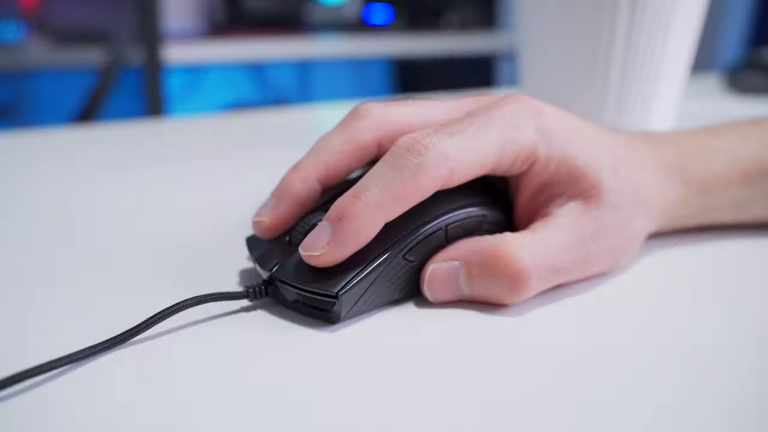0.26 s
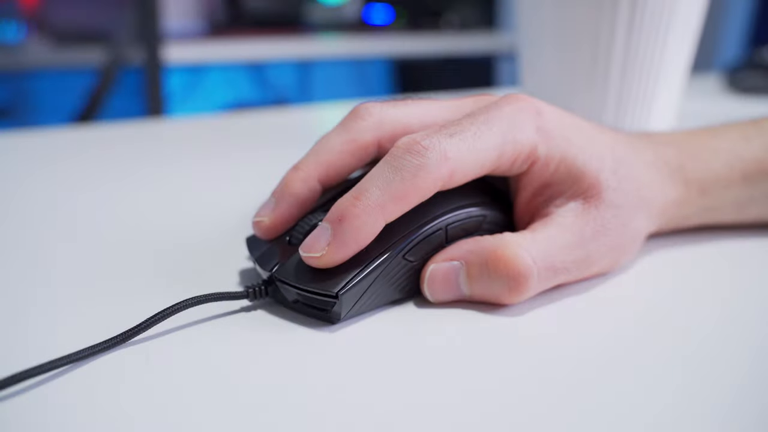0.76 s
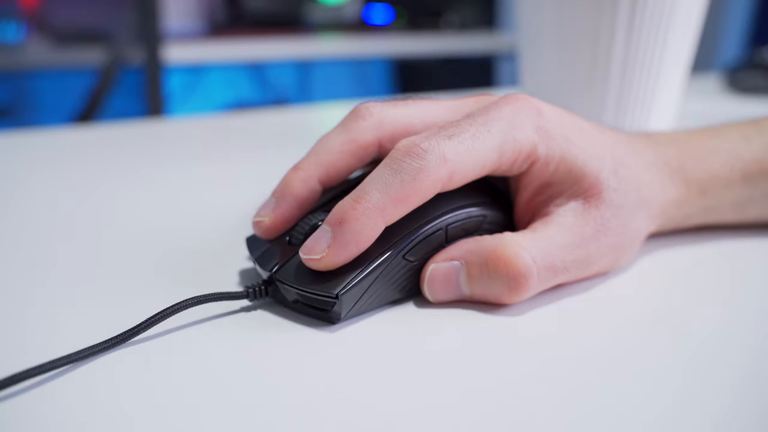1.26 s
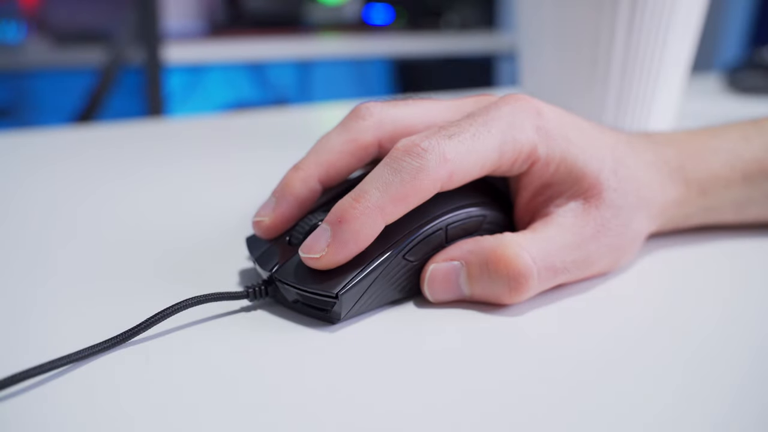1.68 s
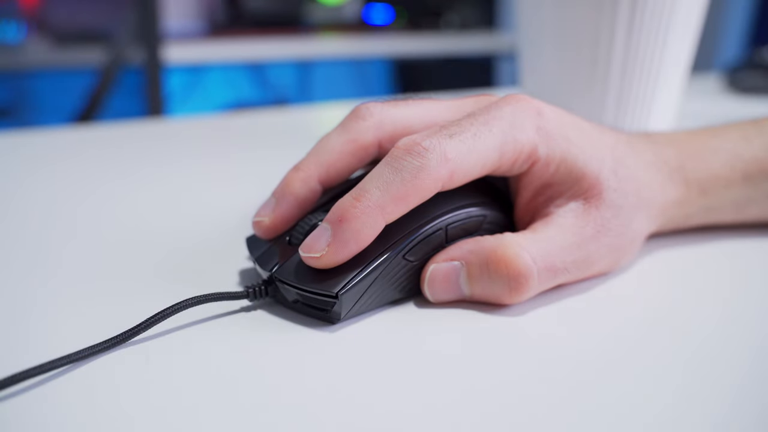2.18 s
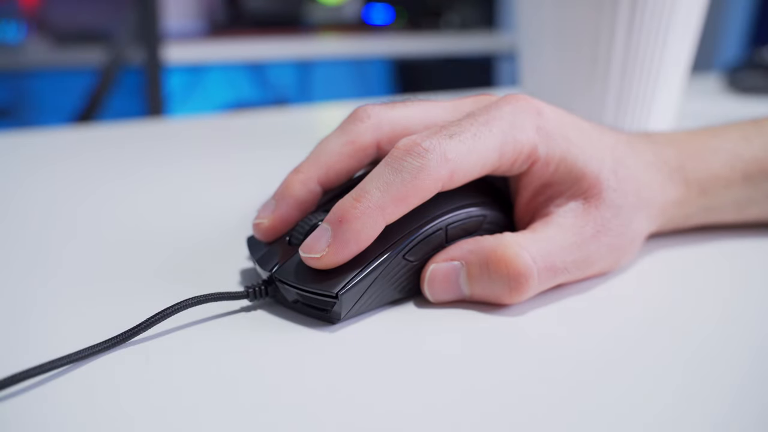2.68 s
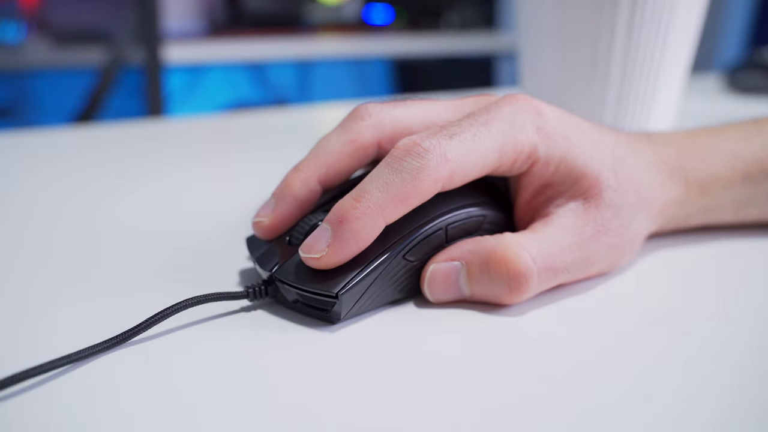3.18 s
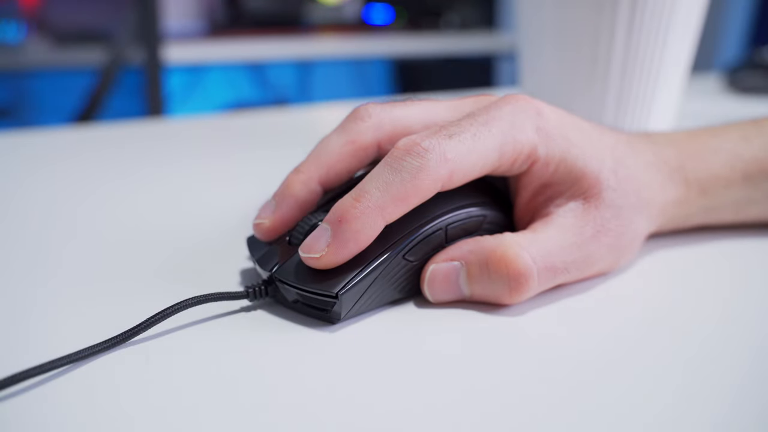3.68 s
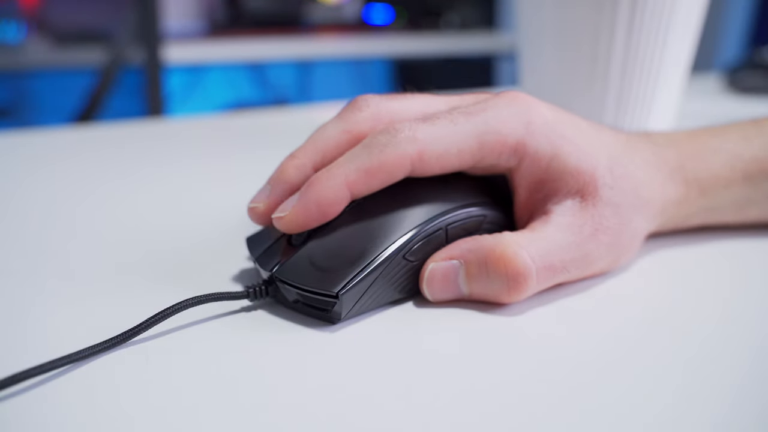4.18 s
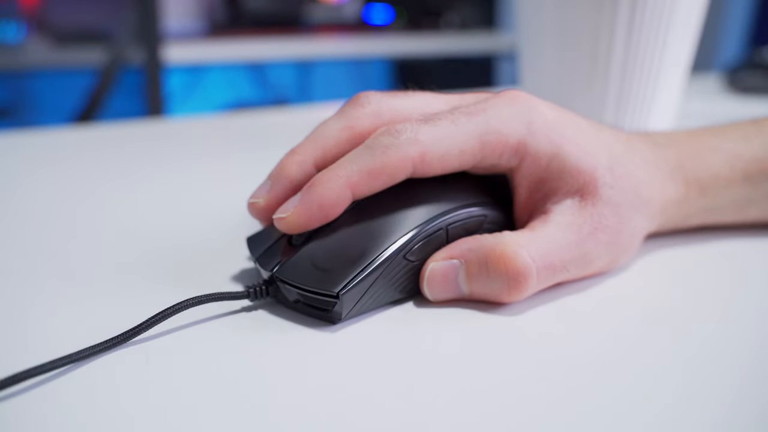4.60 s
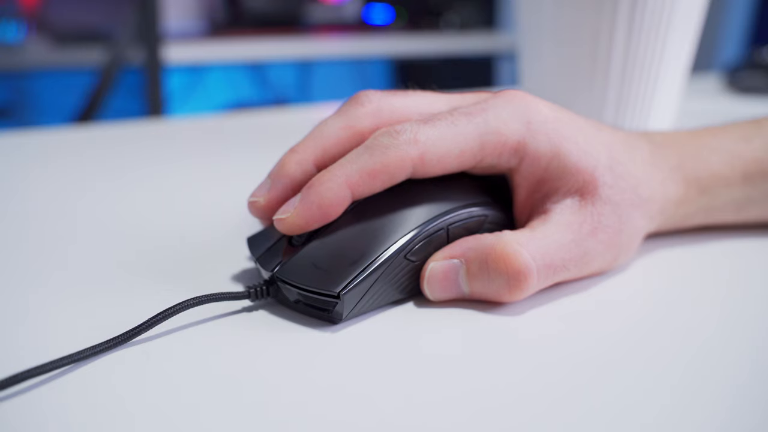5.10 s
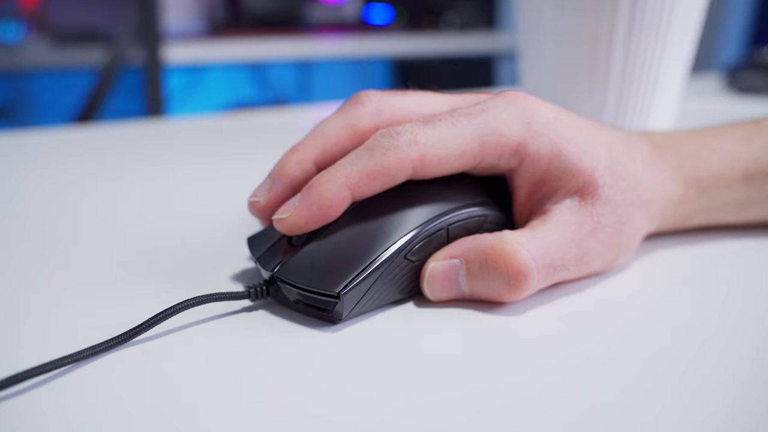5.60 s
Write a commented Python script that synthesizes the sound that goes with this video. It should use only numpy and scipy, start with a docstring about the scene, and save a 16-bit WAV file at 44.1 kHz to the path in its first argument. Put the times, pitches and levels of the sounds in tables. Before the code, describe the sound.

Over the low, steady hum of a computer fan in a small room, a finger works the buttons of a mouse, heard from close by. Every click is a sharp pair of plastic snaps, press and release, about three clicks a second. The left button sounds five times, the right six times, and the wheel button five times, more quietly. Faint fingertip taps and one brief rub of skin fall among them.

```python
"""A computer mouse on a desk, heard from close by. A computer hums throughout, and a small room answers.
First come five left clicks: each switch snaps going down and again coming up, and each snap sets the
plastic shell into free vibration. Now and then a fingertip knocks on the shell. Six right clicks follow,
with a brief rub of skin on plastic during the last. Five clicks of the wheel button end the scene."""
import sys
import numpy as np
from scipy import signal
from scipy.fft import rfft, irfft
from scipy.io import wavfile
from scipy.ndimage import uniform_filter1d

SR = 44100
rng = np.random.default_rng(int(sys.argv[2]) if len(sys.argv) > 2 else 0)


def store_wav(level_fs):
    """Save 16-bit WAV to argv[1]."""
    pcm = np.round(np.clip(np.atleast_2d(level_fs), -1, 1) * 32767)
    wavfile.write(sys.argv[1], SR, pcm.T.astype(np.int16))


N = 257984

# noise spectrum of fan air and microphone hiss: frequency_hz, density_db
FAN_SPECTRUM = [(20, -89), (70, -91.5), (200, -93), (400, -94), (580, -88), (730, -95.5), (1050, -97.5),
                (1230, -102), (1380, -101), (1480, -109), (2600, -112), (3400, -112), (6000, -117),
                (16000, -119.5)]
# mains hum and fan tones: pitch_hz, rms_level_db, line_width_hz
HUM_TONES = [(59.9, -60, .08), (118.4, -75.5, .5), (181, -71, 0.33), (239, -87.5, 0.78), (298.3, -78.5, .5),
             (428.3, -75.5, 3), (521, -73, 1.93), (557.7, -69, 1.53), (600, -73, 1.18), (851, -76.5, 1.2),
             (1348, -80.5, 16), (3510, -87, 77)]
# early reflections from desk objects, screen, shelves and walls: delay_s, level_re_tail_db
EARLY_ECHOES = [(.0024, 8), (.0045, 14.5), (.0099, 11), (.0129, 1), (.0143, 6), (.0194, -9.5), (.0278, 2.5),
                (.0292, -1)]
# reverberation time of the room: frequency_hz, t60_s
ROOM_DECAY = [(150, 0.16), (550, 0.33), (1500, .28), (4000, 0.31), (8000, 0.3), (15000, 0.26)]
# soft knocks of a fingertip, whose pitch depends on the spot hit: start_s, level_db, pitch_ratio
FINGER_KNOCKS = [(.582, -49, 1.06), (1.081, -53, 0.95), (1.427, -49.5, 1), (1.855, -52.5, 1),
                 (2.068, -52, 0.96), (3.088, -51.5, 0.98), (3.562, -36.5, 0.985), (3.876, -48, 0.97),
                 (3.933, -45.5, 1), (4.261, -46, 1.15)]
# modes of the hollow shell under a soft knock: pitch_hz, t60_s, relative_level_db
SHELL_MODES = [(835, 0.022, 3.5), (992, 0.016, 3.5), (1623, .016, -11), (2250, .01, -15)]
# friction spectrum of skin on plastic: frequency_hz, relative_density_db
FRICTION_SPECTRUM = [(60, -5), (150, 25.5), (350, 10.5), (1500, -6), (3000, 4), (4200, -4), (5400, 6),
                     (6600, -8), (7800, 1), (11000, -14), (16000, -19)]
# button strokes; a snap switch always trips at the same force, so only timing is listed: press_s, release_s
LEFT_STROKES = [(0.1477, 0.2717), (0.5532, 0.7061), (0.9199, 1.0508), (1.2648, 1.3988), (1.6318, 1.7846)]
RIGHT_STROKES = [(2.0414, 2.1804), (2.3961, 2.539), (2.7353, 2.8809), (3.0589, 3.2155), (3.3951, 3.5374),
                 (3.74, 3.9009)]
WHEEL_STROKES = [(4.2598, 4.4548), (4.7983, 4.9719), (5.1266, 5.2762), (5.3932, 5.5399), (5.6759, 5.8227)]
# modes of each button, from desk thud to switch spring: pitch_hz, t60_s, press_db, release_db
LEFT_BUTTON_MODES = [(176, 0.021, -36.5, -40), (813, 0.0046, -28.0, -30.5), (880, 0.022, -39.5, -40.5),
                     (1325, 0.048, -53.5, -54.1), (1640, 0.047, -50, -51), (2440, 0.0041, -35.5, -35.5),
                     (2886, 0.015, -35.5, -37.9), (3200, 0.014, -41.5, -41.5), (4124, 0.016, -27, -38.3),
                     (4424, 0.017, -29.5, -35.5), (4720, 0.0055, -25.5, -28.5), (5540, 0.01, -27.5, -44),
                     (6100, 0.011, -32, -31.5), (6960, 0.012, -44, -31.5), (7310, 0.012, -35, -34.5),
                     (7950, 0.011, -22.5, -27.5), (8560, 0.0039, -24, -18.5), (9300, 0.0064, -29, -29),
                     (9604, 0.0095, -49, -36), (10394, 0.0079, -27, -21), (11400, 0.0063, -28, -25),
                     (11870, 0.0057, -24, -27.5), (12596, 0.0073, -21, -37), (13112, 0.016, -40, -37.8),
                     (13600, 0.0088, -33, -29), (14000, 0.0052, -24.5, -27), (15000, 0.0094, -37, -26),
                     (15234, 0.0072, -27.5, -22)]
RIGHT_BUTTON_MODES = [(140, 0.026, -42, -43.5), (562, 0.02, -33.5, -36.5), (708, 0.006, -27, -56),
                      (947, 0.0045, -31, -47.5), (1726, 0.024, -50.5, -47), (2115, 0.0043, -34.5, -36.5),
                      (3410, 0.0026, -26.5, -27.5), (3674, 0.015, -29.5, -25.5), (3763, 0.0079, -24, -20.5),
                      (3963, 0.0056, -18.5, -20.5), (4596, 0.0067, -22.5, -32), (5215, 0.014, -30, -34),
                      (5790, 0.015, -37.5, -39), (6510, 0.0073, -32.5, -25.5), (7180, 0.01, -35.5, -23),
                      (7390, 0.013, -36, -27.5), (7720, 0.0049, -19, -12.5), (8320, 0.003, -23, -16.5),
                      (8940, 0.012, -36.5, -33), (9750, 0.0047, -25, -32.5), (10400, 0.0092, -31, -38.5),
                      (10890, 0.0064, -28, -38.5), (12070, 0.0043, -37.5, -24), (12467, 0.0088, -33, -28),
                      (12700, 0.0076, -30.5, -29), (14130, 0.0096, -36.5, -32), (14260, 0.0145, -44, -35.5),
                      (15460, 0.003, -21, -30)]
WHEEL_BUTTON_MODES = [(159, 0.033, -42, -48), (338, 0.007, -35, -30.5), (480, 0.0077, -53, -35.5),
                      (990, 0.016, -44, -48.5), (1270, 0.022, -61, -56), (2210, 0.014, -55, -49.5),
                      (2518, 0.028, -50.5, -44), (3200, 0.0054, -30, -33), (3760, 0.016, -38.5, -43),
                      (4160, 0.0086, -36.5, -37.0), (4795, 0.011, -32.5, -29.5), (5360, 0.019, -46, -40.2),
                      (5610, 0.0095, -44, -37.5), (6055, 0.011, -30, -28.5), (6950, 0.0051, -34, -34.5),
                      (7450, 0.0102, -34, -38), (8000, 0.0114, -40.5, -43.5), (8530, 0.012, -46, -39),
                      (9750, 0.0036, -27, -30.5), (10080, 0.011, -30.5, -35.5), (10460, 0.012, -42, -37.5),
                      (11150, 0.0037, -29.5, -31.9), (11940, 0.0031, -26, -27.5),
                      (12070, 0.011, -39.0, -37.3), (13147, 0.0065, -51.6, -59), (14008, 0.0068, -44, -56),
                      (14659, 0.0047, -41.5, -46), (15585, 0.0119, -56, -52)]
# spectrum each button radiates to all sides, and so into the room: frequency_hz, press_db, release_db
LEFT_RADIATION = [(200, -5.5, -4), (537, -15.5, -11), (1880, -27, -29), (2800, -24, -23.5),
                  (4280, -10.5, -17.5), (5460, -17.5, -26), (5960, -16.5, -14.5), (6560, -22, -22),
                  (7400, -15.5, -11), (7680, -17.5, -20.2), (11100, -26, -21), (11650, -18.5, -15.5),
                  (12250, -16.5, -22.5), (15260, -28.5, -24)]
RIGHT_RADIATION = [(199.4, -16, -10.5), (550, -8, -11), (1590, -28, -28), (3180, -23, -22),
                   (3840, -10.5, -6), (4620, -15.5, -21.8), (6440, -22, -20.5), (7080, -22.5, -12),
                   (8090, -14.5, -10.5), (8900, -24.5, -23.4), (10600, -22, -27), (12400, -26.5, -20.5),
                   (14400, -21.5, -23.5), (15550, -33, -37)]
WHEEL_RADIATION = [(200, -5.5, -13), (750, -17.5, -26), (1690, -37, -33), (2160, -26, -25.5),
                   (2950, -24.3, -22.5), (3530, -21.5, -27.5), (4300, -21, -20), (5900, -18.5, -15.5),
                   (7150, -27, -33), (9250, -30.5, -19.5), (9650, -18, -29), (12100, -33.3, -24),
                   (12700, -36, -41.0), (15550, -42.9, -49)]

PULSE_SAMPLES = 256


def from_db(db):
    """Amplitude ratio of a level in decibels."""
    return 10 ** (np.asarray(db) / 20)


def at_hz(table, hz, column=1):
    """Interpolation of one table column on a logarithmic frequency axis."""
    table = np.array(table)
    return np.interp(np.log(np.maximum(hz, 1)), np.log(table[:, 0]), table[:, column])


def coloured_noise(spectrum):
    """Spectral shaping: white noise is weighted to the given power per hertz."""
    white = rfft(rng.standard_normal(N)) * np.sqrt(SR / 2)
    hz = np.linspace(0, SR / 2, len(white))
    return irfft(white * from_db(at_hz(spectrum, hz)), N)


def add(track, start_s, sound):
    """Superposition: a sound adds linearly to the track from start_s on."""
    remainder = track[round(start_s * SR):][:len(sound)]
    remainder += sound[:len(remainder)]


def computer():
    """Broadband fan noise plus hum and blade tones, each broadened into a band by phase diffusion."""
    t = np.arange(N) / SR
    out = coloured_noise(FAN_SPECTRUM)
    for hz, level_db, width_hz in HUM_TONES:
        wander = np.cumsum(rng.standard_normal(N)) * np.sqrt(2 * np.pi * width_hz / SR)
        phase = 2 * np.pi * (hz * t + rng.random()) + wander
        out += np.sqrt(2) * from_db(level_db) * np.sin(phase)
    return out


def room(sound, first_wall_s, echo_smear_s):
    """Reverberation: convolution with early echoes and an exponentially decaying tail, at unit gain."""
    t = np.arange(SR // 2) / SR
    echo_power = sum(from_db(level_db) ** 2 * (t >= delay_s) * np.exp(-abs(t - delay_s) / echo_smear_s)
                     for delay_s, level_db in EARLY_ECHOES)
    build_up = np.clip(2 * t / first_wall_s - 1, 0, 1)
    white = rfft(rng.standard_normal(len(t)))
    hz = np.linspace(0, SR / 2, len(white))
    edges_hz = np.r_[0, np.geomspace(200, SR / 2, 12)]
    response = np.zeros(len(t))
    for low, high in zip(edges_hz, edges_hz[1:]):
        band = irfft(white * (hz >= low) * (hz < high), len(t))
        tail = build_up * from_db(-60 * t / at_hz(ROOM_DECAY, (low + high) / 2))
        response += band * np.sqrt(tail ** 2 + echo_power)
    # the room's colour is evened out over any 100 Hz, so it favours no single note
    transfer = rfft(response, SR)
    transfer /= np.sqrt(uniform_filter1d(abs(transfer) ** 2, size=100))
    return signal.fftconvolve(sound, irfft(transfer)[:len(t)])[:N]


def strike(hz, t60_s, level_db, detune, scatter_db=1):
    """Free vibration after a blow: damped modes, whose strength and pitch vary a little with the grip."""
    t = np.arange(SR // 20) / SR
    level_draw, pitch_draw = rng.standard_normal((len(hz), 2)).T
    # neighbouring modes start in opposite directions, so the sound swells for a fraction of a millisecond
    polarity = (-1) ** np.arange(len(hz))
    amplitude = polarity * from_db(level_db + scatter_db * level_draw)
    pitch_hz = hz * (1 + detune * pitch_draw)
    decay = np.exp(-np.log(1000) * t / t60_s[:, None])
    return amplitude @ (decay * np.sin(2 * np.pi * pitch_hz[:, None] * t))


def skin_slide(let_go_s, peak_db, swell_db_per_s, fade_db_per_s):
    """Sliding friction: a finger's rubbing swells until the skin lets go, then dies at once."""
    t = np.arange(N) / SR - let_go_s
    envelope = from_db(peak_db + np.minimum(swell_db_per_s * t, -fade_db_per_s * t))
    friction = coloured_noise(FRICTION_SPECTRUM)
    return envelope * friction / friction.std()


def fingertip(room_db):
    """Soft impacts excite the shell's low modes, and skin slides once. Returns (direct, into the room)."""
    hz, t60_s, mode_db = np.transpose(SHELL_MODES)
    direct = np.zeros(N)
    for start_s, level_db, pitch_ratio in FINGER_KNOCKS:
        add(direct, start_s, strike(hz * pitch_ratio, t60_s, mode_db + level_db, detune=.01))
    direct += skin_slide(let_go_s=3.876, peak_db=-46.5, swell_db_per_s=1100, fade_db_per_s=2600)
    return np.array([direct, from_db(room_db) * direct])


def radiated_pulse(radiation, column):
    """Fourier synthesis: frequencies in phase sum to a short centred pulse with the tabled spectrum."""
    hz = np.linspace(0, SR / 2, PULSE_SAMPLES // 2 + 1)
    pulse = irfft(from_db(at_hz(radiation, hz, column)))
    return np.roll(pulse, PULSE_SAMPLES // 2) * signal.windows.tukey(PULSE_SAMPLES)


def button(strokes, modes, radiation, press_gain_db, release_gain_db, room_db):
    """Snap-through: a spring excites the same modes going down and up. Returns (direct, into the room)."""
    hz, t60_s, press_db, release_db = np.transpose(modes)
    direct, radiated = np.zeros((2, N))
    for press_s, release_s in strokes:
        press = press_s, press_db + press_gain_db, radiated_pulse(radiation, column=1)
        release = release_s, release_db + release_gain_db, radiated_pulse(radiation, column=2)
        for start_s, mode_db, pulse in (press, release):
            add(direct, start_s, strike(hz, t60_s, mode_db, detune=.004))
            add(radiated, start_s - PULSE_SAMPLES / 2 / SR, from_db(room_db) * pulse)
    return np.array([direct, radiated])


def scene():
    """The direct and reverberant fields of buttons and finger superpose on the computer's steady sound."""
    left = button(LEFT_STROKES, LEFT_BUTTON_MODES, LEFT_RADIATION,
                  press_gain_db=-.4, release_gain_db=0, room_db=1.5)
    right = button(RIGHT_STROKES, RIGHT_BUTTON_MODES, RIGHT_RADIATION,
                   press_gain_db=-.1, release_gain_db=.3, room_db=.73)
    wheel = button(WHEEL_STROKES, WHEEL_BUTTON_MODES, WHEEL_RADIATION,
                   press_gain_db=-.33, release_gain_db=-.36, room_db=1.4)
    direct, radiated = left + right + wheel + fingertip(room_db=-11)
    # so small a body sends little bass into the room
    radiated = signal.sosfilt(signal.butter(2, 190, "high", fs=SR, output="sos"), radiated)
    reverberant = room(radiated, first_wall_s=.005, echo_smear_s=.00078)
    return (direct + reverberant + computer())[None]


def record(dry):
    """Band limiting: a linear-phase low-pass filter cuts steeply at 16 kHz."""
    low_pass = signal.firwin(161, 16000, fs=SR)
    return signal.fftconvolve(dry, low_pass[None], mode="same")


dry = scene()
out = record(dry)
store_wav(out)
```